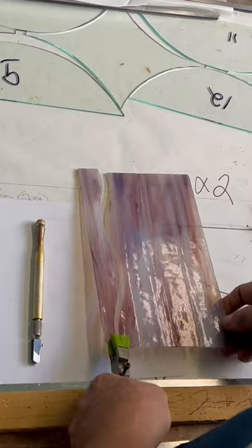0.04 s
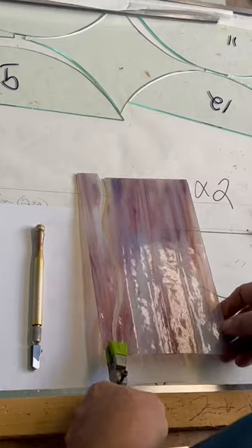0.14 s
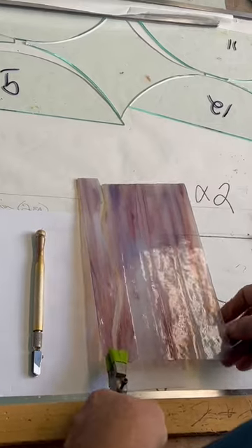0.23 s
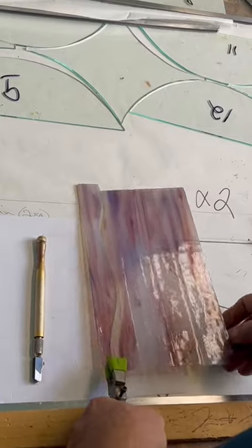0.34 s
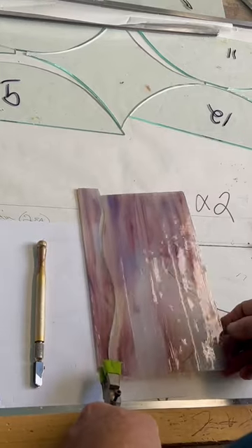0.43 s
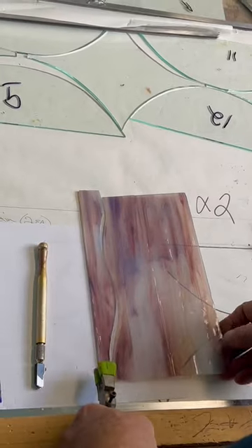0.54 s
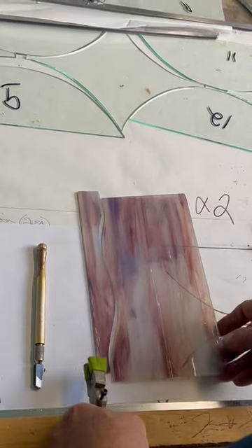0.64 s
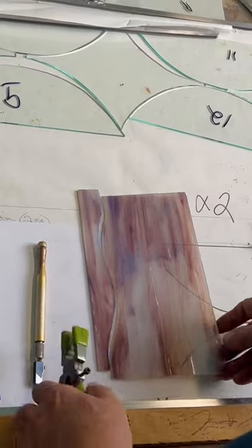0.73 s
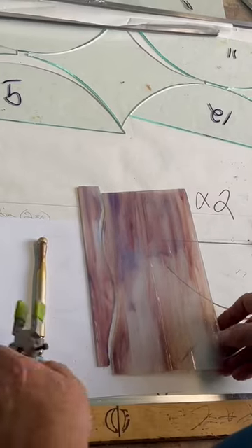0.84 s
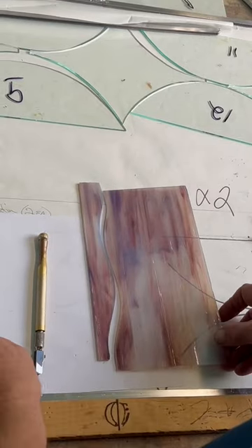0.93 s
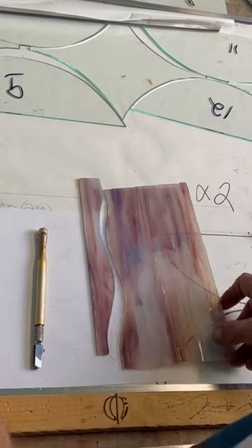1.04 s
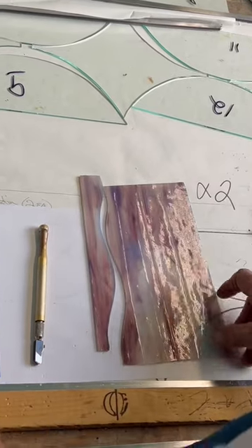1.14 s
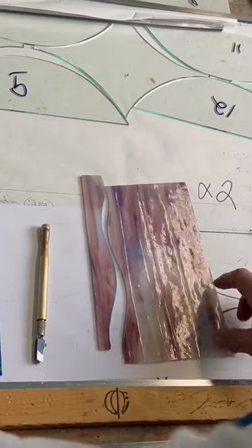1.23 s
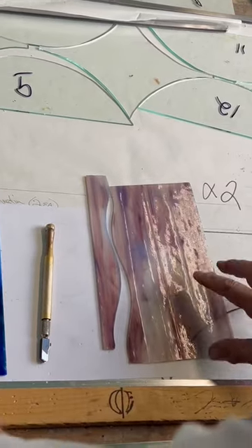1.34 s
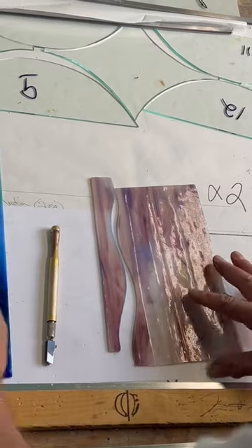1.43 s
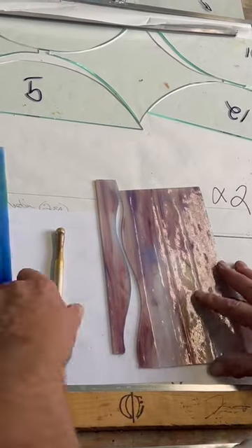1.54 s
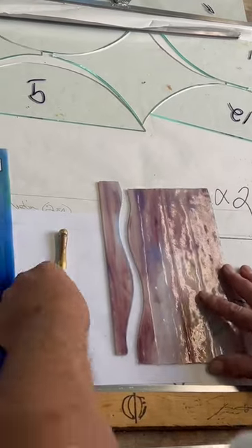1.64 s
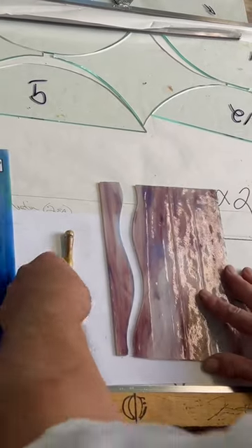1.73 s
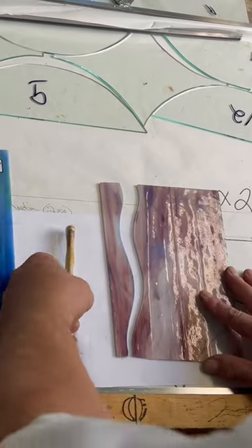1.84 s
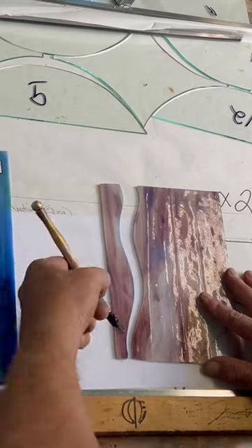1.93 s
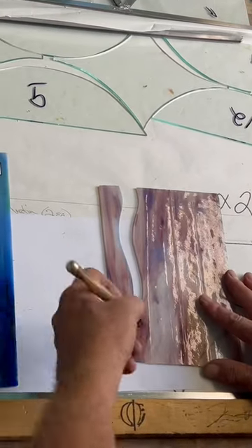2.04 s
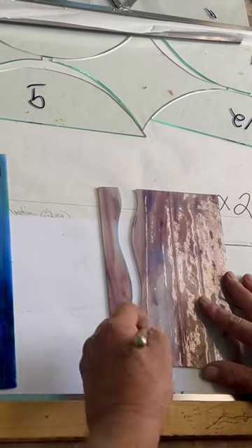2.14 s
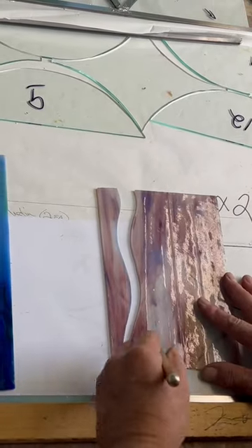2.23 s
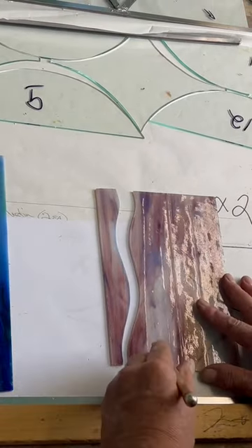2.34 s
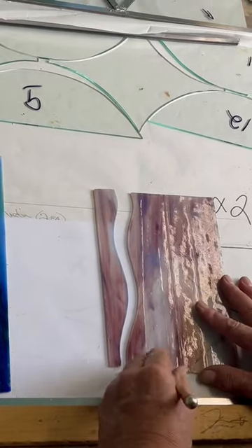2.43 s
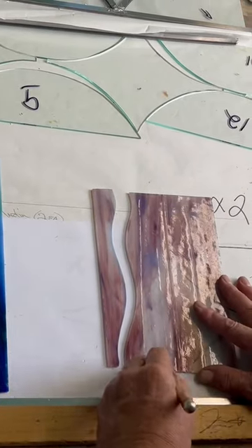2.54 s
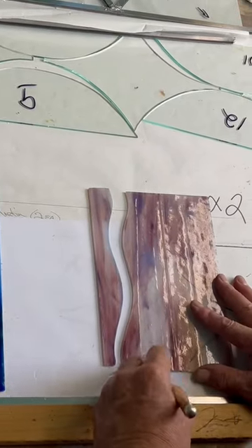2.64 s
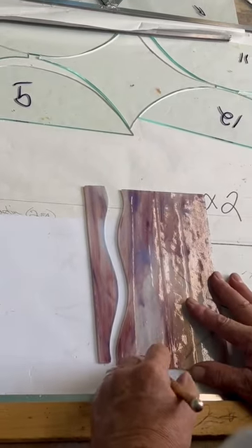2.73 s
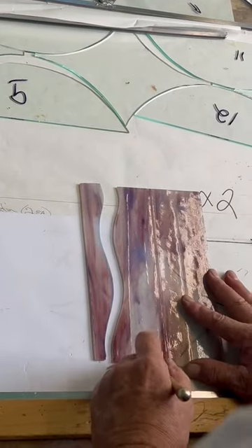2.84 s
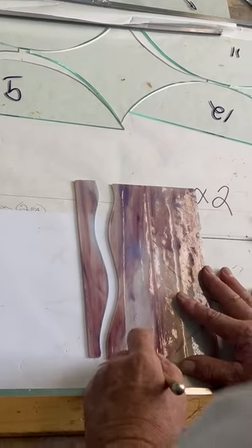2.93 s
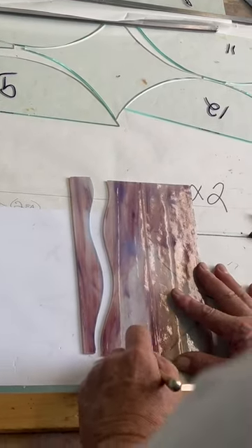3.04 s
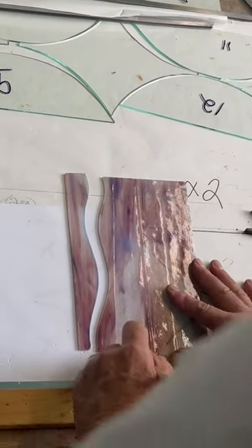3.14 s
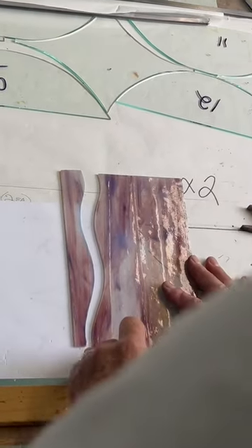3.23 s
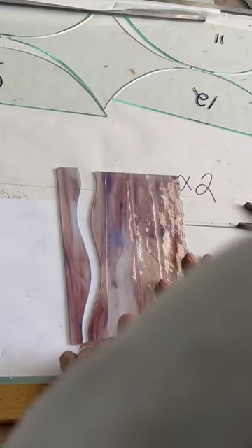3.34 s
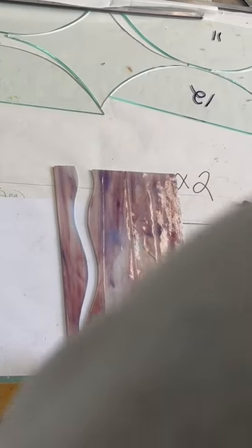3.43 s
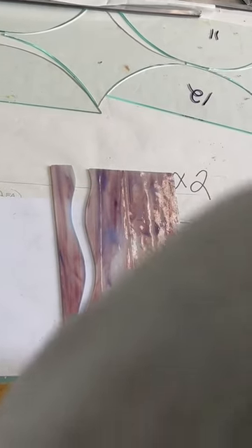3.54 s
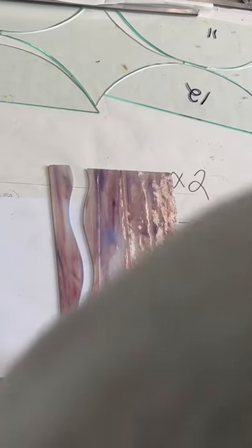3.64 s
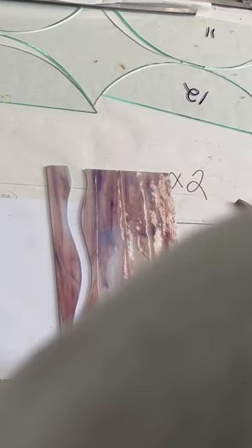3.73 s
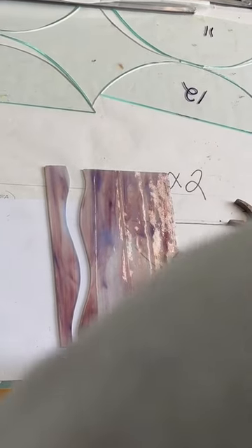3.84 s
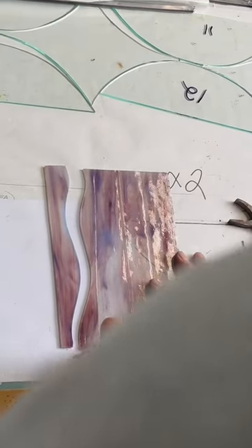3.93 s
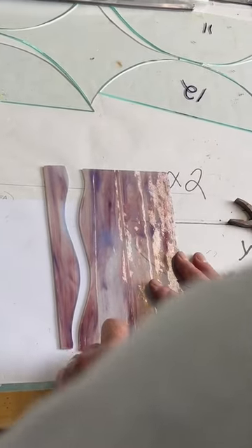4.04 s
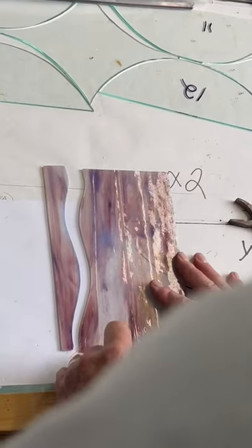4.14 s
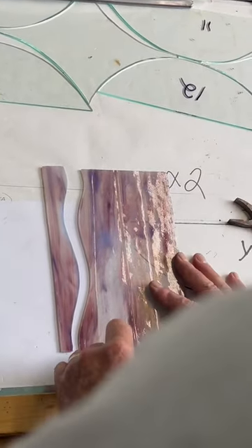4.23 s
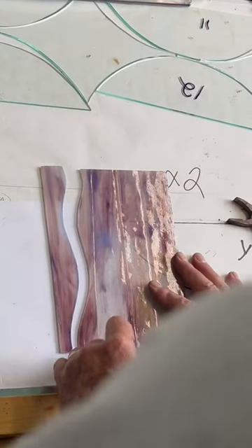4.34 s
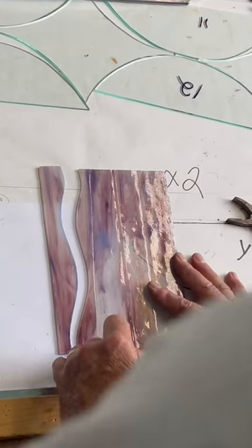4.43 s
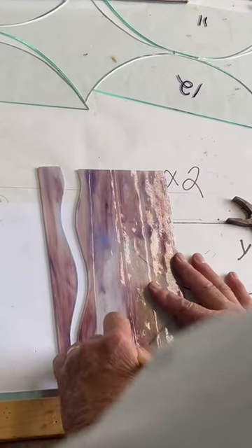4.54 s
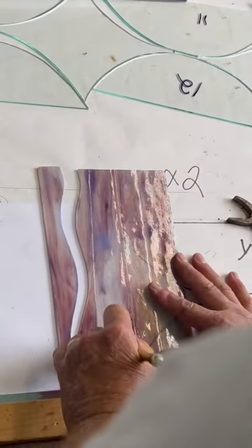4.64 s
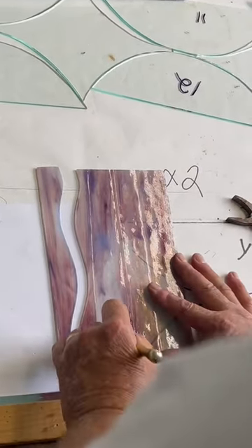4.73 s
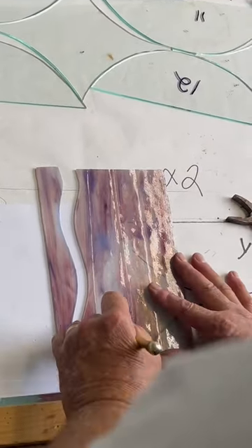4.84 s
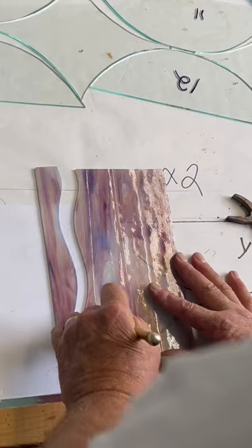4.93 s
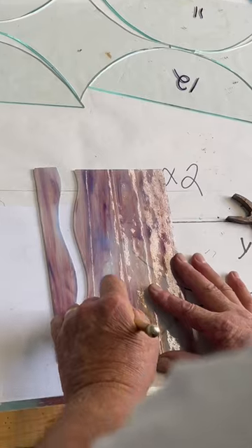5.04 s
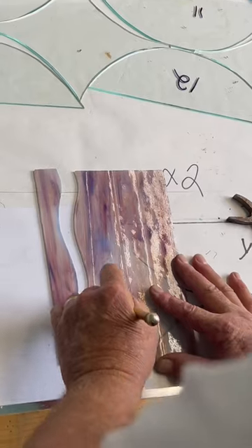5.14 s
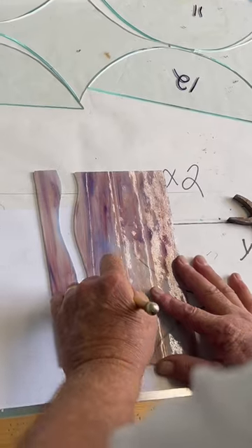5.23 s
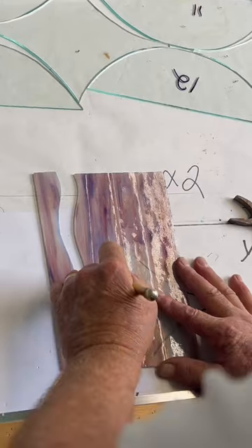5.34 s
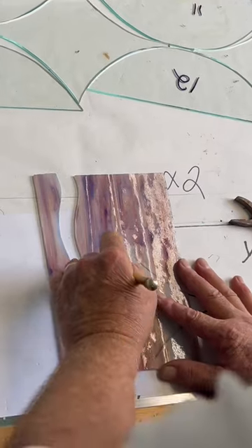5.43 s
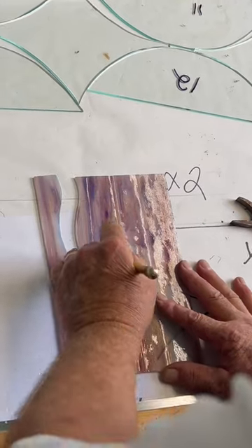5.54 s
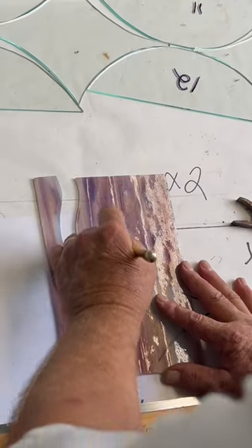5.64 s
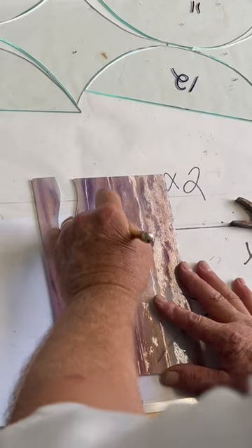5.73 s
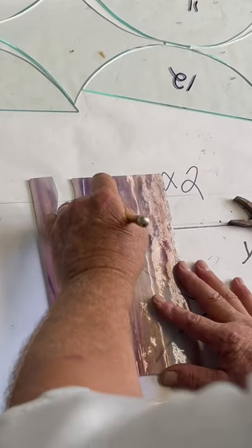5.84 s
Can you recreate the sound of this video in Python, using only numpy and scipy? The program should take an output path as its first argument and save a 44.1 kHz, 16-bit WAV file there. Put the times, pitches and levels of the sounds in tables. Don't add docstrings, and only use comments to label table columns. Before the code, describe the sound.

Glass edges clink and steel tools tick and knock on a wooden bench, then a cutter wheel hisses steadily across glass.

```python
import sys
import numpy as np
from scipy import signal
from scipy.fft import rfft, irfft, next_fast_len
from scipy.io import wavfile
from scipy.ndimage import uniform_filter1d, minimum_filter1d

SR = 44100
rng = np.random.default_rng(int(sys.argv[2]) if len(sys.argv) > 2 else 0)


def to_wav(sig):
    pcm = np.clip(np.atleast_2d(sig), -1, 1) * 32767
    pcm = np.round(pcm).astype(np.int16)
    wavfile.write(sys.argv[1], SR, pcm.T)


def gain_from_decibels(decibels):
    exponent = np.asarray(decibels, float) / 20
    return 10 ** exponent


N = 259308

# t/s, grit/dB, thud/dB, clack/dB, hollow knock/dB
KNOCK_ROWS = [(0.35, -50, -40, -38.5, -37), (0.3542, -60.5, -30, -50, -29),
              (0.473, -56, -28.5, -46.5, -30.5), (0.486, -70, -31.5, -51, -29.5),
              (0.498, -75, -30, -47, -28), (.524, -67, -37, -58, -42), (0.512, -59, -31, -56, -36),
              (0.804, -71, -45, -55, -44), (1.002, -71, -59, -61, -61), (1.1385, -48, -30, -41.5, -28),
              (1.1407, -62.5, -26.5, -47.5, -20.5), (1.3, -60, -54.5, -50.5, -49.5),
              (1.309, -26.5, -19.5, -27, -16.5), (1.3227, -34.5, -24, -21, -24.5),
              (1.327, -34, -16.5, -26.5, -11.5), (1.357, -66.5, -27, -24, -29), (1.537, -61, -32, -75, -37),
              (1.571, -67, -39.5, -66, -42), (3.354, -73, -51, -55, -54), (3.359, -65.5, -42, -44.5, -46.5),
              (3.3692, -31, -24.5, -21, -22.5), (3.3731, -34.5, -12.5, -9.5, -13),
              (3.3765, -35, -9.5, -21.5, -8.5), (3.383, -45.5, -20, -26, -28),
              (3.389, -37, -16.5, -29.5, -23.5), (3.403, -43.5, -27, -27, -27.5),
              (3.409, -36.5, -26, -36.5, -27), (3.426, -51, -24.5, -34, -28),
              (3.92, -57.5, -39.5, -49.5, -45), (4.268, -78, -63, -55, -72), (4.405, -75, -68, -57, -58),
              (4.457, -66, -59, -42.5, -56), (5.605, -84, -34.5, -70, -29.5)]
# t/s, ring/dB, handle/dB, snap/dB
TICK_ROWS = [(0.326, -37.5, -39, -64), (0.3487, -53, -53, -58), (0.8825, -46, -55.5, -61),
             (1.081, -65, -80, -71.5), (1.115, -60, -60, -63.5), (1.1199, -46, -52, -77.5),
             (1.246, -64, -66, -68.5), (1.534, -50, -55, -60.5), (1.6836, -50, -52, -43.5),
             (2.007, -64, -83, -77.5), (2.1197, -63, -57, -72.5), (2.195, -66.5, -73, -91),
             (2.3386, -40.5, -53, -70.5), (2.3753, -62, -78, -71), (2.4204, -16.5, -40, -42),
             (2.557, -34.5, -39.5, -64), (2.592, -29, -42.5, -61), (2.6577, -42, -49.5, -75),
             (2.8, -44.5, -51.5, -78), (3.3684, -26, -33, -37), (3.37, -29, -28.5, -35.5),
             (3.9173, -47, -34.5, -59.5), (4.266, -45, -53, -58), (4.289, -48, -72, -85),
             (4.427, -44, -63, -78), (4.4048, -52, -41.5, -52), (4.4566, -46, -54, -52)]
# t/s, fracture level/dB
SCORE_ROWS = [
    (4.456, -42.5),
    (4.47, -39),
    (4.84, -37),
    (4.99, -38),
    (5.02, -35.5),
    (5.42, -36),
    (5.64, -35),
    (5.85, -35),
    (5.88, -45),
]
SLIDE_ATTACK_S, SLIDE_FADE_DB_PER_S = 0.0052, 244


def column(rows):
    return np.transpose(np.array(rows, float))


def in_time(rows):
    s, *columns = column(rows)
    return [np.interp(np.arange(N) / SR, s, c) for c in columns]


def at_hz(points, hz):
    f, value = column(points)
    return np.interp(np.log(np.maximum(hz, 1)), np.log(f), value)


def rms_one(x):
    return x / np.sqrt(np.mean(x ** 2) + 1e-30)


def band(x, low_hz, high_hz):
    return signal.sosfilt(signal.butter(2, [low_hz, high_hz], "band", fs=SR, output="sos"), x)


def drift(rate_hz, count=1, start=0):
    knots = rng.standard_normal((count, 400))
    at = np.arange(N - start) / SR * rate_hz
    return np.array([np.interp(at, np.arange(400), k) for k in knots])


def colour(x, spectrum):
    size = next_fast_len(N)
    gain = gain_from_decibels(at_hz(spectrum, np.fft.rfftfreq(size, 1 / SR)))
    return rms_one(irfft(rfft(x, size) * gain, size)[..., :N])


def two_ports(mid, side):
    # f/Hz, left-right likeness/1
    likeness = [(60, 0.99), (200, 0.95), (400, 0.29), (700, 0.053), (1400, -0.16), (3000, 0.16),
                (7000, 0.96), (15000, 0.6)]
    size = next_fast_len(len(mid))
    alike = np.clip(at_hz(likeness, np.fft.rfftfreq(size, 1 / SR)), -1, 1)
    m = rfft(mid, size) * np.sqrt(.5 + alike / 2)
    s = rfft(side, size) * np.sqrt(.5 - alike / 2)
    return irfft([m + s, m - s], size)[:, :len(mid)]


def ring(clicks, hz, t60_s):
    r, w = gain_from_decibels(-60 / (t60_s * SR)), 2 * np.pi * hz / SR
    return signal.lfilter([0, np.sin(w)], [1, -2 * r * np.cos(w), r * r], clicks + 1e-18)


def strike(rows, modes, level_db, spread_db):
    s, *strength_db = column(rows)
    at, out = np.round(s * SR).astype(int), np.zeros(N)
    chance = rng.standard_normal((len(at), len(modes)))
    for k, (hz, db, t60_s, which) in enumerate(modes):
        hit_db = strength_db[round(which)] + db + level_db + spread_db * chance[:, k]
        clicks = np.zeros(N)
        clicks[at] = gain_from_decibels(hit_db) * (-1) ** k
        out += ring(clicks, hz, t60_s)
    return out


def pushes(times, level_db, soft_s):
    out, t = np.zeros(N), np.arange(800) / SR
    for s, db, soft in zip(times, level_db, soft_s):
        pulse = t * np.exp(-t / max(soft, 2e-5))
        out[round(s * SR):][:800] += gain_from_decibels(db) * pulse / pulse.sum()
    return out


def bursts(times, level_db, length_s):
    out, bins = np.zeros(N), np.arange(2049)
    for s, db, length in zip(times, level_db, np.broadcast_to(length_s, times.shape)):
        samples = max(length, 1e-4) * SR / 2
        delays = 4 + samples * rng.exponential(1, 70)
        lateness = np.interp(bins, np.linspace(0, 2048, 70), delays)
        crack = irfft(np.exp(-1j * np.pi / 2048 * np.cumsum(lateness)))[:2048]
        out[round(s * SR):][:2048] += gain_from_decibels(db) * np.sqrt(samples) * crack
    return out


def grains(per_s, spread_db):
    sizes = gain_from_decibels(spread_db * np.minimum(rng.exponential(1, N), 5)) * rng.choice([-1, 1], N)
    return sizes * (rng.random(N) < per_s / SR)


def in_strokes(rows, attack_s, fade_db_per_s):
    coarse = np.arange(0, N, 32)
    start, length, level_db, change_db = column(rows)[:, :, None]
    since, length = coarse / SR - start, np.maximum(length, 1e-3)
    db = level_db + change_db * np.clip(since / length, 0, 1)
    db = db - fade_db_per_s * np.maximum(since - length, 0)
    power = np.sum((gain_from_decibels(db) * np.clip(since / attack_s, 0, 1)) ** 2, axis=0)
    return np.interp(np.arange(N), coarse, np.sqrt(power))


def dying_noise(t60_table, spectrum, rise_s, size):
    t, edges = np.arange(size) / SR, 40 * 2 ** np.arange(0, 8.8, 1 / 4)
    white, tail = rng.standard_normal((3, 2, size)), 0
    for k, (low, high) in enumerate(zip(edges, edges[1:])):
        hz = np.sqrt(low * high)
        fall = gain_from_decibels(-60 * t / at_hz(t60_table, hz)) * np.clip(t / rise_s, 0, 1)
        part = band(white[k % 3], low, high) * fall
        energy = np.sum(part ** 2, axis=1, keepdims=True)
        tail = tail + part * gain_from_decibels(at_hz(spectrum, hz)) * np.sqrt(2 * (high - low) / SR / energy)
    return two_ports(*tail)


def through(x, response):
    return signal.fftconvolve(x[None], response, axes=1)[:, :N]


def background():
    # f/Hz, density/dB per Hz
    rumble_spectrum = [(12, -47.5), (20, -15.5), (45, -6.5), (80, -6), (92, -15), (114, 1), (149, -21),
                       (180, -18.5), (200, -24), (291, -28), (324, -29.5), (390, -33.5), (568, -39),
                       (2470, -55.5), (12000, -64.5), (15600, -104), (22000, -120)]
    # start/s, length/s, whine/dB, change over the run/dB
    whine_runs = [
        (0.0, 0.66, -65, 3.5),
        (1.7, 0.35, -68, 2),
        (2.29, 0.28, -67, 2.5),
        (2.46, 0.33, -74, 2),
    ]
    lull_s, lull_lasts_s, lull_db = 4.38, 0.13, -5.5
    shake_hold_s, shake_db, score_shake_db = 0.099, -33, -52
    wander_db = 2. * drift(6.)[0]
    wander_db = wander_db + lull_db * np.exp(-((np.arange(N) / SR - lull_s) / lull_lasts_s) ** 2)
    shakes = [(s, shake_hold_s, thud_db + shake_db, 0) for s, _, thud_db, *_ in KNOCK_ROWS]
    shakes.append((SCORE_ROWS[0][0], N / SR, score_shake_db, 0))
    level = np.hypot(gain_from_decibels(-50), in_strokes(shakes, attack_s=0.11, fade_db_per_s=84))
    rumble = level * gain_from_decibels(wander_db) * colour(two_ports(*rng.standard_normal((2, N))), rumble_spectrum)
    whine = rms_one(band(rng.standard_normal((2, N)), 1220, 1373))
    whine += gain_from_decibels(-4) * rms_one(band(rng.standard_normal(N), 325, 385))
    whine += gain_from_decibels(-28) * rms_one(band(rng.standard_normal(N), 9700, 12400))
    return rumble + in_strokes(whine_runs, attack_s=0.044, fade_db_per_s=91.5) * whine


def sliding():
    # start/s, length/s, hiss/dB, change over the stroke/dB
    slide_strokes = [(0.0, 0.07, -56.5, -10), (.13, 0.18, -59, -9.5), (.3, 0.026, -62, 11.5),
                     (.89, 0.18, -56, -7), (1.072, 0.032, -45.5, -4.5), (1.531, 0.013, -31.5, -19.5),
                     (1.545, 0.077, -59, 9), (1.655, 0.032, -46.5, -0.5), (2.332, .07, -70, -8),
                     (2.417, 0.11, -40, -16), (2.795, 0.065, -75, -4), (3.222, 0.046, -61.5, 5.5),
                     (3.31, 0.097, -76, 18), (3.915, 0.037, -56, 1.5), (4.266, 0.0092, -61, 8.5),
                     (4.4, 0.041, -46, -3)]
    # start/s, length/s, drag/dB, change over the
    # stroke/dB
    drag_strokes = [(0.0, 2.03, -67.5, 0.5), (.38, 0.15, -63.5, 14.5), (.95, 0.29, -74.5, 3),
                    (1.32, 0.03, -37, 0), (2.3, 0.19, -72, 12.5), (2.55, 0.11, -56, -4),
                    (2.73, 0.065, -57.5, 2), (3.28, 0.082, -77, 20.5), (3.42, 0.12, -60.5, 12.5),
                    (3.92, 0.19, -60, -9), (4.27, .12, -68, -1)]
    # f/Hz, density/dB per Hz
    paper_spectrum = [(800, -7), (1500, -3), (3700, -8.5), (6500, -10.5), (8800, -13.5), (9600, -2.5),
                      (11000, -27), (15500, -25.5)]
    hiss = gain_from_decibels(-10.5 + 0.5 * drift(14.0)[0]) * colour(grains(7600.0, 3.0), paper_spectrum)
    drag = gain_from_decibels(-4.5) * rms_one(band(rng.standard_normal(N), 240, 890))
    return (in_strokes(slide_strokes, SLIDE_ATTACK_S, SLIDE_FADE_DB_PER_S) * hiss
            + in_strokes(drag_strokes, attack_s=.03, fade_db_per_s=169.5) * drag)


def whisper():
    # start/s, length/s, 12 kHz level/dB, 15 kHz level/dB, change over the stroke/dB
    treble_strokes = [(0.0, .3, -86.5, -99, 2), (.325, .04, -68, -66, -5), (.36, .14, -84, -80, -8),
                      (.56, .3, -93, -108, 0), (.71, .04, -89, -89, 0), (.885, 0.18, -85, -82, -2),
                      (1.06, .09, -73, -74, -1), (1.2, .09, -83, -88.5, 0), (1.31, .07, -56.5, -58, -7),
                      (1.535, .14, -75, -75, 4), (1.685, 0.075, -69, -69, -11), (1.85, 0.51, -95, -100, 1),
                      (2.42, .07, -95, -66, -6.5), (2.68, 0.53, -98, -108, 0), (3.23, .05, -78, -78.5, -1.5),
                      (3.372, .12, -48.5, -55, -13.5), (3.56, 0.35, -97, -108, 2), (3.92, 0.045, -73, -78, 1),
                      (4.05, 0.24, -97, -108, 0), (4.27, 0.044, -73, -81, -5)]
    fine = grains(9000., 1.8)
    rows = column(treble_strokes)
    low_gain = in_strokes(rows[[0, 1, 2, 4]].T, SLIDE_ATTACK_S, SLIDE_FADE_DB_PER_S)
    top_gain = in_strokes(rows[[0, 1, 3, 4]].T, SLIDE_ATTACK_S, SLIDE_FADE_DB_PER_S)
    low = rms_one(band(band(fine, 9900, 13000), 9900, 13000))
    top = rms_one(band(band(fine, 14400, 15800), 14400, 15800))
    return low_gain * low + top_gain * top


def clinks():
    # t/s, scrape/dB, ring/dB, favoured pitch f/Hz
    touches = [(0.2738, -20, -39.5, 1393), (0.3135, -38, -51, 1276), (0.3267, -50, -46.5, 1380),
               (0.3501, -13.5, -53, 1360), (0.4743, -29, -39, 1360), (0.484, -52, -39, 1410),
               (.4885, -52, -40.5, 1130), (0.4954, -44, -36, 1350), (.504, -52, -42.5, 1420),
               (0.519, -47, -46, 1500), (0.5264, -47, -46, 1650), (0.93, -64, -57.5, 1435),
               (0.952, -60, -60.5, 1435), (0.972, -56, -49.5, 1650), (1.048, -41, -50, 1220),
               (1.066, -62, -58.5, 1247), (1.0829, -46.5, -52.5, 1108), (1.087, -56.5, -45.5, 1110),
               (1.0755, -74.5, -49, 2650), (1.0795, -79, -47, 2670), (1.084, -73, -45, 2620),
               (1.091, -73, -48, 2695), (1.107, -44.5, -50, 1670), (1.1138, -22.5, -42.5, 1450),
               (1.1205, -18.5, -45.5, 1520), (1.1373, -75, -53.5, 1850)]
    # f/Hz, level/dB, t60/s, strength column/index (0 scrape, 1-4 mode groups)
    strip_modes = [(1117, 4.5, 0.096, 1), (1435, 2, 0.072, 2), (1686, 0, 0.087, 3), (2070, -15.5, 0.088, 3),
                   (2210, -13.5, 0.1, 3), (2660, 1, 0.096, 4), (3400, -20, .06, 4), (4140, -17, .05, 4),
                   (4810, -15, 0.06, 4)]
    fall_db_per_octave, reach_db = 37.5, 23.5
    s, peak_db, ring_db, favoured_hz = column(touches)
    leading_hz = column(strip_modes)[0][[0, 1, 2, 5]]
    octaves = np.abs(np.log2(leading_hz[:, None] / favoured_hz))
    modes_db = ring_db - np.minimum(fall_db_per_octave * octaves, reach_db)
    rows = np.vstack([s, peak_db, modes_db]).T
    scrape = band(bursts(s, peak_db - 23.0, 0.0035), 900, 3800)
    return strike(rows, strip_modes, level_db=-1.5, spread_db=4) + scrape


def knocks():
    # f/Hz, density/dB per Hz
    bench_spectrum = [(50, -6), (113, -5), (190, -1), (340, 2.5), (500, -6), (950, -8), (1600, -15),
                      (2500, -27.5), (3900, -30), (5500, -40.5), (9000, -43), (14000, -42)]
    # f/Hz, t60/s
    bench_t60 = [(60, .2), (120, .14), (300, .045), (1000, .03), (3000, .02), (9000, .012)]
    # f/Hz, level/dB, t60/s, strength column/index (rounded; 0 grit .. 3 knock)
    top_modes = [(114.6, -1.5, 0.21, 2), (200, -0.5, 0.048, 0), (232, -2, 0.024, 0.5), (300, 1.5, 0.049, 3),
                 (387.3, 2, 0.051, 3), (529.4, 15.5, 0.048, -0.5), (650, 8, 0.022, -0.5),
                 (830, -12.5, 0.048, 2), (944, 2.5, 0.028, 2), (1100, -2, 0.046, 2), (1356, -2, 0.03, 2),
                 (1654, -8, 0.072, 2)]
    s, crack_db, thud_db, clack_db, knock_db = column(KNOCK_ROWS)
    contact_s = np.full(len(s), 0.0013)
    blow = band(pushes(s, thud_db + 51., contact_s / 3), 70, 250)
    blow = blow + band(pushes(s, knock_db + 44., contact_s / 3), 250, 650)
    blow = blow + band(pushes(s, clack_db + 47.0, contact_s / 12), 820, 2000)
    blow = blow + band(bursts(s, crack_db + 40.5, 0.0015), 1200, 16000)
    punch = band(pushes(s, knock_db + 19.5, contact_s / 4.2), 150, 900)
    wood = through(blow, dying_noise(bench_t60, bench_spectrum, rise_s=0.00059, size=SR // 5))
    return -punch + wood + strike(KNOCK_ROWS, top_modes, level_db=-7.5, spread_db=3.5)


def clatter():
    clatter_hold_s, clatter_db = 0.0079, -20.5
    buzz_hold_s, buzz_db = 0.012, -22.5
    jumps = [(s, clatter_hold_s, clack_db + clatter_db, 0) for s, _, _, clack_db, _ in KNOCK_ROWS]
    buzzes = [(s, buzz_hold_s, handle_db + buzz_db, 0) for s, _, handle_db, _ in TICK_ROWS]
    chips = grains(2500., 4.6)
    chatter = rms_one(band(band(chips, 760, 1800), 600, 4100))
    buzz = rms_one(band(chips, 1600, 2600))
    return (in_strokes(jumps, attack_s=0.0068, fade_db_per_s=151.5) * chatter
            + in_strokes(buzzes, attack_s=0.003, fade_db_per_s=198.5) * buzz)


def ticks():
    # f/Hz, level/dB, t60/s, strength column/index (0 ring)
    tool_modes = [(1450, -5.5, 0.037, 0), (1830, -14, 0.069, 0), (2640, -10, 0.028, 0),
                  (3250, -6.5, 0.015, 0), (4100, -7.5, 0.0085, 0), (5140, -10, 0.013, 0),
                  (5760, -2.5, 0.028, 0), (6460, -14.5, 0.013, 0), (7600, -14.5, .025, 0),
                  (9100, -14, 0.027, 0)]
    tip_share, tip_level_db, pan_db = 0.6, -4.5, 0
    s, ring_db, handle_db, snap_db = column(TICK_ROWS)
    tip_db = tip_share * handle_db + (1 - tip_share) * snap_db + tip_level_db
    hard_s = np.zeros(len(s))
    tip = pushes(s, tip_db + 30.0, hard_s) + bursts(s, tip_db - 0.5, 0.00024)
    tip = band(tip, 2500, 4500)
    handle = pushes(s, handle_db + 24.0, hard_s) + bursts(s, handle_db + 12.0, 0.00053)
    handle = band(handle, 1200, 2600)
    snap = band(bursts(s, snap_db + 13.5, 0.0015), 6600, 16500)
    snap += band(bursts(s, snap_db + 18.0, 0.0015), 7120, 11000)
    snap += band(bursts(s, snap_db + 11.5, 0.0027), 4800, 5400)
    ringing = strike(TICK_ROWS, tool_modes, level_db=-15.0, spread_db=3.0)
    return (ringing + tip + handle + snap) * gain_from_decibels([[pan_db / 2], [-pan_db / 2]])


def singing(hz, t):
    # t/s, duration/s, f/Hz, lift/dB
    sung_regions = [(4.62, 0.22, 1414, 17.5), (4.69, 0.19, 2100, 12), (5, 0.14, 530, 2),
                    (9.4, 0.12, 660, 7), (5.05, 0.18, 2600, -1), (4.64, 0.25, 2460, 11.5),
                    (5.3, 0.27, 2300, 7), (7.3, 0.18, 2800, 7.5), (5.57, 0.1, 2870, 10.5),
                    (3.6, 0.068, 2830, -11), (5.3, 0.38, 3260, 4.5), (5.25, 0.08, 3400, -11),
                    (5.63, 0.075, 3500, -10), (4.55, 0.06, 3800, 5.5), (5.3, 0.1, 4330, 12),
                    (4.55, .2, 3300, -3), (5.1, 0.42, 4500, -12.5), (5.3, 0.19, 5380, 11),
                    (5.6, 0.12, 5900, 3), (4.9, 0.23, 1340, 15.5), (4.74, 0.15, 6200, 8),
                    (5.2, 0.38, 7220, -34), (5.5, 0.083, 7100, -3), (6.4, 0.19, 11000, -2),
                    (5.0, 0.07, 8350, 9.5), (5.7, 0.19, 8500, 7), (4.6, 0.26, 9150, 10),
                    (4.6, .12, 13200, 2.5), (4.87, 0.12, 15000, 8), (2.8, 0.27, 15000, -13),
                    (5.9, 0.059, 14200, 4), (5.5, 0.1, 11000, 2.5), (7.1, 0.13, 12000, -11),
                    (4.8, 0.051, 9500, 1), (4.3, .3, 1240, 6), (5.1, 0.15, 3300, 4),
                    (4.8, 0.21, 1980, 10.5)]
    width = .04
    s, lasting, centre_hz, lift_db = column(sung_regions)[:, :, None]
    near = np.exp(-(np.log(hz / centre_hz) / width) ** 2 - ((t - s) / lasting) ** 2)
    return gain_from_decibels(np.sum(lift_db * near, axis=0))


def scoring():
    # f/Hz, density/dB per Hz
    fracture_spectrum = [(400, -18.5), (540, -6.5), (800, -7.5), (1300, -3), (2400, 1), (3100, -3),
                         (3900, -1.5), (4600, -2.5), (5500, -4.5), (7000, -1.5), (8300, 0.5), (9250, 0),
                         (12300, -3), (15400, -5.5)]
    modes, hop = 380, 64
    fracture_db, = in_time(SCORE_ROWS)
    press_db = -59.5 + 1.455 * (fracture_db - fracture_db[-1])
    start = round(SCORE_ROWS[0][0] * SR)
    active = np.arange(N) >= start
    cracks = [grains(6000., 3.26)[start:] for port_pattern in range(2)]
    pitches_hz = 450 + (np.arange(modes) + rng.uniform(-.4, .4, modes)) * 15400 / modes
    nodes = drift(5.01, count=61, start=start)[:, ::hop]
    regions = drift(3.43, count=38, start=start)[:, ::hop]
    t = np.arange(start, N, hop) / SR
    sheet = np.zeros((2, N))
    for k, hz in enumerate(pitches_hz):
        gain = gain_from_decibels(3.6 * nodes[k % 61] + 1.2 * regions[k // 10]) * singing(hz, t)
        sheet[k % 2, start:] += ring(cracks[k % 2], hz, .05) * np.repeat(gain, hop)[:N - start]
    direct = rng.standard_normal((2, N)) * gain_from_decibels(-11.)
    direct = (sheet / sheet[:, start:].std() + direct) * active
    hiss = colour(two_ports(*direct), fracture_spectrum) * np.sqrt(1 - start / N)
    press_noise = two_ports(*rms_one(band(rng.standard_normal((2, N)), 44, 310)))
    press = gain_from_decibels(press_db + 2.1 * drift(25.)[0]) * press_noise
    return (gain_from_decibels(fracture_db + 0.33 * drift(40.)[0]) * hiss + press) * active


def room(x):
    # f/Hz, t60/s
    room_t60 = [(60, 0.94), (300, 0.31), (1000, 0.37), (3000, 0.34), (10000, 0.29)]
    # f/Hz, level/dB
    room_spectrum = [(60, -20.5), (300, -8), (1000, 1), (3000, -0.5), (6000, 0.5), (9500, 0), (12500, -5)]
    return through(x, dying_noise(room_t60, room_spectrum, rise_s=0.0035, size=SR))


def scene():
    near, glass = ticks() + knocks() + clatter() + sliding(), clinks()
    reflected = room(near.mean(0) + gain_from_decibels(-7.) * glass)
    return near + glass + reflected + scoring() + background() + two_ports(whisper(), whisper())


def thin_treble(x):
    sparse_hz, top_hz, band_hz = 9410, 15600, 230
    keep_db, keep_chance_db = -4.5, 2.5
    holes_from_hz, hole_db = 2700, -5.
    hz, _, cells = signal.stft(x, SR, "hann", 2048)
    power = np.mean(np.abs(cells) ** 2, axis=0) + 1e-20
    body = power[(hz > 2500) & (hz < sparse_hz)].mean(0)
    for low in np.arange(sparse_hz, SR / 2, band_hz):
        inside = (hz >= low) & (hz < low + band_hz)
        whim = rms_one(uniform_filter1d(rng.standard_normal(len(body)), size=3))
        threshold = body * gain_from_decibels(2 * keep_db + 2 * keep_chance_db * whim)
        cells[:, inside] *= (power[inside].mean(0) > threshold) & (low < top_hz)
    floor = minimum_filter1d(body, size=9)
    steady = (body > gain_from_decibels(-40 * 2) * floor.max() * 1e3) * (floor > body / 3)
    around = uniform_filter1d(power, size=48, axis=0) * steady
    for low in np.arange(holes_from_hz, sparse_hz, band_hz / 2):
        inside = (hz >= low) & (hz < low + band_hz / 2)
        cells[:, inside] *= power[inside].mean(0) > around[inside].mean(0) * gain_from_decibels(2 * hole_db)
    thin = signal.istft(cells, SR, "hann", 2048)[1][:, :N]
    block = round(0.0045 * SR)
    bright = uniform_filter1d(band(x.mean(0), 2500, 9000) ** 2, size=block)
    attack = bright > 24 * np.roll(bright, block)
    open_share = np.clip(2 * uniform_filter1d(attack * 1., size=block), 0, 1)
    return thin + open_share * (x - thin)


def roll_off(x):
    return signal.sosfilt(signal.butter(12, 17090, fs=SR, output="sos"), x)


def record(dry):
    # f/Hz, left-right level/dB
    port_tilt = [(200, 0.), (400, 1.5), (800, 0.), (2400, .8), (3400, 4.), (4400, 8.), (6000, 4.),
                 (8000, 1.), (15000, 0.)]
    # f/Hz, width/Hz, level/dB
    duct_notches = [
        (10150, 560, -18.),
        (13600, 560, -17.),
    ]
    port_lag_s, phase_top_rad, phone_top_hz = 3.4e-5, 1.7, 16400
    size = next_fast_len(N)
    hz = np.fft.rfftfreq(size, 1 / SR)
    tilt_db = at_hz(port_tilt, hz) / 2
    notch_db = sum(db * np.exp(-((hz - centre) / width) ** 2) for centre, width, db in duct_notches)
    notch_db = notch_db - np.maximum(hz - phone_top_hz, 0) / 25
    lag_rad = np.minimum(2 * np.pi * np.outer([0, port_lag_s], hz), phase_top_rad)
    ports = gain_from_decibels([notch_db + tilt_db, notch_db - tilt_db]) * np.exp(-1j * lag_rad)
    heard = irfft(rfft(dry, size) * ports, size)[:, :N]
    mix = thin_treble(heard)
    return roll_off(mix)


dry = scene()
out = record(dry)
to_wav(out)
```